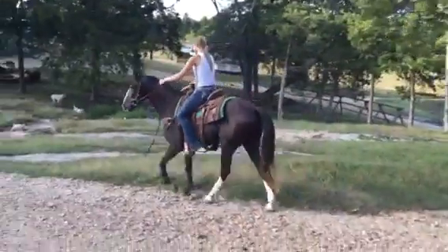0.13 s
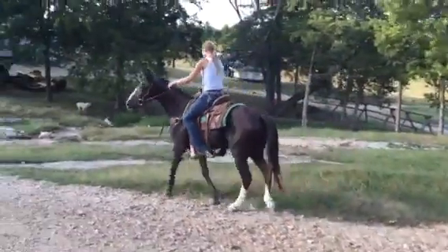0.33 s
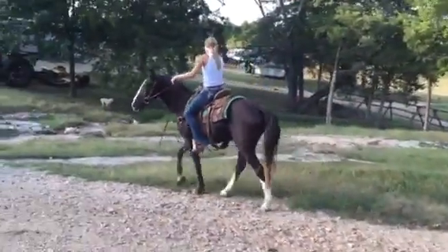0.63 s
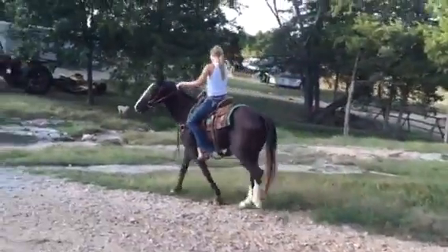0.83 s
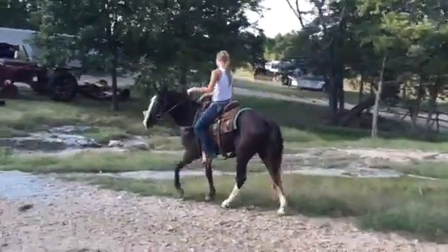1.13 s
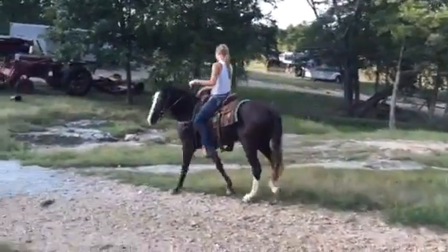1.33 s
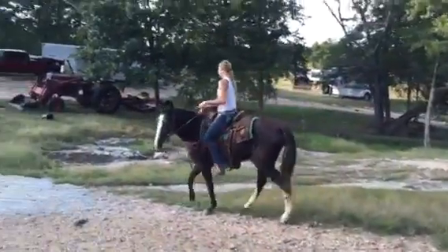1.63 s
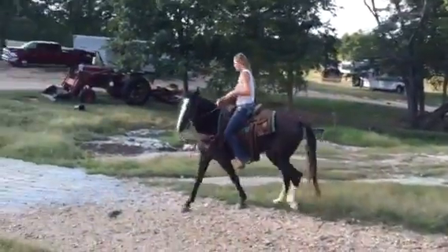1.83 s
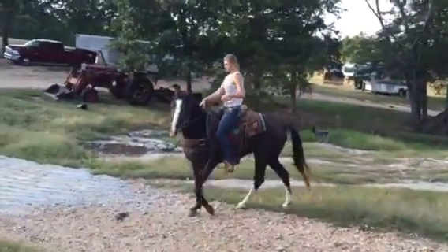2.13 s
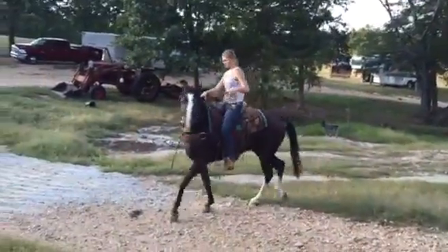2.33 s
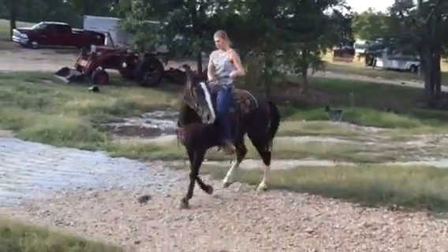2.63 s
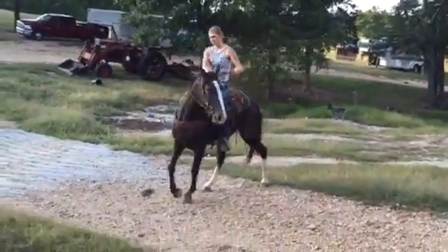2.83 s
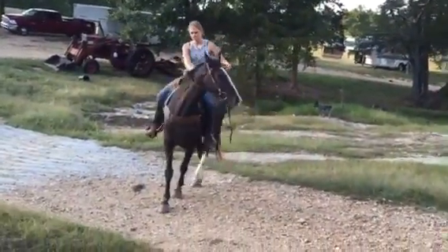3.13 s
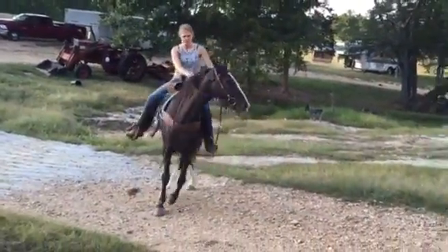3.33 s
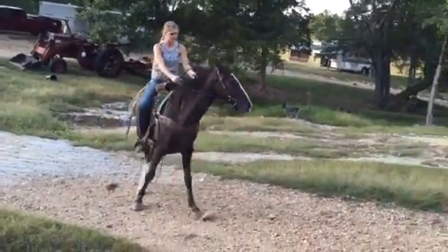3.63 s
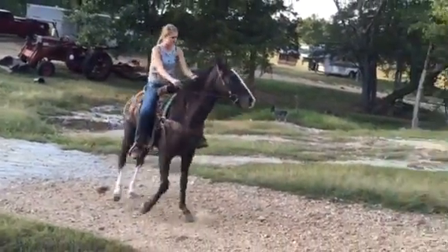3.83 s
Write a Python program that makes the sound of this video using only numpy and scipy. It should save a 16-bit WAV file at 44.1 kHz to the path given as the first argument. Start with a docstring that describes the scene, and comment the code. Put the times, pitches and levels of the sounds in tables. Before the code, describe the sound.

A horse walks over gravel outdoors, gritty crunches and clicking stones over a faint breeze.

```python
"""Gravel crunches under a horse's hooves from the first instant, with stones knocking hollowly.
Each crunch layers dense random contacts of fine grit and coarser stones over low noise from the soil.
A faint breeze of coloured noise hisses throughout; knocks and pebble clicks are resonant noise bursts.
Later, firm steps thud as dying low tones of steady pitch with a slap; the yard adds weak, dull scatter."""
import sys
import numpy as np
from scipy import signal
from scipy.fft import rfft, irfft
from scipy.io import wavfile
from scipy.ndimage import uniform_filter1d

SR = 44100
rng = np.random.default_rng(int(sys.argv[2]) if len(sys.argv) > 2 else 0)


def wav_out(sig):
    """Save sig, one row per channel (or a flat mono array), as 16-bit PCM at SR to the path in sys.argv[1]."""
    wavfile.write(sys.argv[1], SR, np.round(np.clip(np.atleast_2d(sig).T, -1, 1) * 32767).astype(np.int16))


N = 176400
T = np.arange(N) / SR  # s
BRIEF = T[:12000]  # time axis of one short sound, s


def amp(db):
    """Decibels to gain."""
    return 10 ** (np.asarray(db) / 20)


def unit(x):
    """Scales to rms 1."""
    return x / np.sqrt(np.mean(x ** 2) + 1e-20)


def add(mix, start_s, sound):
    """Mixes a sound in at its start time, cutting it at the end of the mix."""
    part = mix[max(round(start_s * SR), 0):][:len(sound)]
    part += sound[:len(part)]


def colour(x, points):
    """Shapes the spectrum by (Hz, dB) points joined along log frequency; rms 1."""
    point_hz, point_db = np.transpose(points)
    hz = np.fft.rfftfreq(len(x), 1 / SR)
    gain_db = np.interp(np.log(hz + 1), np.log(point_hz), point_db)
    return unit(irfft(rfft(x) * amp(gain_db), len(x)))


def fade(t60_s):
    """A short envelope that falls 60 dB in t60_s seconds."""
    return amp(-60 * BRIEF / t60_s)


def burst(hz, q, t60_s, rise_s=1 / SR):
    """A rough, dying contact: fading noise through one resonance, applied twice; peak 1."""
    resonance = signal.iirpeak(hz, q, fs=SR)
    contact = rng.standard_normal(len(BRIEF)) * np.minimum(BRIEF / rise_s, 1) * fade(t60_s)
    ringing = signal.lfilter(*resonance, signal.lfilter(*resonance, contact))
    return ringing / abs(ringing).max()


def grains(level, per_s, spread_db, cycles, lo_hz, hi_hz, count=28):
    """Random contacts between stones of many sizes: dense under the hoof, single ticks as they settle."""
    thinning = 0.38  # contacts a second follow this power of the level
    busy = (level / level.max()) ** thinning
    out = np.zeros(N)
    for hz in np.geomspace(lo_hz, hi_hz, count):
        strength_db = spread_db * np.minimum(rng.exponential(size=N), 3.5)
        strength = amp(strength_db) * np.sign(rng.standard_normal(N))
        hits = strength * (rng.random(N) < busy * per_s / count / SR)
        ring = np.exp(-BRIEF * hz / cycles) * np.sin(2 * np.pi * hz * BRIEF)
        out += np.sqrt(hz) * signal.oaconvolve(hits, unit(ring))[:N]
    return out / np.sqrt(busy)  # evens out the power; the layer's level is applied later


def patchy(x, depth_db=3):
    """The colour drifts as the hoof meets different stones: smoothed random gain over time and pitch."""
    spectrum = signal.stft(x, nperseg=512, noverlap=384)[2]
    across_pitch = uniform_filter1d(rng.standard_normal(spectrum.shape), 5, 0)
    drift = unit(uniform_filter1d(across_pitch, 12, 1))
    return unit(signal.istft(spectrum * amp(depth_db * drift), nperseg=512, noverlap=384)[1][:N])


# Hooves landing, rolling or dragging:
# (start_s, rise_s, fall_20db_s [time to fall 20 dB], grit_db, stones_db, soil_db)
HOOF_CRUNCHES = [ (-0.015, 0.045, 0.127, -37.5, -36, -41), (0.284, 0.0073, 0.1492, -32, -38.5, -51.5),
                 (0.33, 0.09, 0.1457, -36.5, -38, -44), (0.455, 0.0366, 0.09, -40, -39, -42.5),
                 (0.786, 0.007, 0.042, -36, -34.5, -48), (0.848, 0.0304, 0.0629, -42, -44.5, -54.5),
                 (0.951, 0.055, 0.1071, -46, -40, -48), (1.243, 0.0209, .06, -37, -38, -50),
                 (1.29, .055, .04, -52, -43, -55), (1.426, 0.01855, 0.1127, -41, -37, -46.5),
                 (1.803, 0.0183, 0.11, -44, -38, -45.5), (1.913, 0.0306, 0.0871, -38.5, -52, -73),
                 (1.995, 0.00276, 0.1258, -42, -35.5, -50.5), (2.240, 0.0074, 0.1034, -32.5, -39, -45),
                 (2.29, 0.0489, 0.04, -45.5, -39.5, -48), (2.432, 0.007, 0.05, -49, -45.5, -47.5),
                 (2.721, 0.019, .03, -52, -49, -47), (2.502, .006, 0.08, -47, -43, -51),
                 (2.624, 0.0197, 0.0713, -46, -44, -54.5), (2.916, 0.0229, 0.1408, -42.5, -38, -46.5),
                 (3.057, 0.0177, 0.0143, -37, -49, -81), (3.142, 0.0035, 0.08, -47, -39, -41),
                 (3.172, 0.00306, 0.0306, -38, -35, -35), (3.258, 0.0218, 0.088, -48, -41.5, -50),
                 (3.393, 0.0204, 0.04, -36.5, -43, -50), (3.442, 0.0029, 0.065, -40, -43, -52),
                 (3.574, 0.003, 0.06, -47, -42.5, -57), (3.59, 0.08, 0.16, -47, -43.5, -52),
                 (3.717, 0.008, 0.023, -27.5, -28, -41.5), (3.735, 0.00676, 0.0116, -37.5, -27, -38),
                 (3.772, 0.0097, 0.0018, -44, -31.5, -41)]
# Loose gravel trickling: (time_s, grit_level_db)
LOOSE_TRICKLE = [(0, -54.5), (.66, -53.5), (.76, -70.5), (.9, -56.5), (1.75, -58), (2.12, -53), (2.2, -60),
                 (4, -56)]


def gravel_levels(trickle_stones_db=-3):
    """Each hoof presses and releases grit, stones and soil; powers add over a trickle of loose gravel."""
    loose = amp(np.interp(T, *np.transpose(LOOSE_TRICKLE)))
    power = np.square([loose, amp(trickle_stones_db) * loose, np.zeros(N)])
    for start_s, rise_s, fall_s, *layers_db in HOOF_CRUNCHES:
        t = np.maximum(T - start_s, 0)
        press = np.sqrt(np.minimum(t / rise_s, 1)) * amp(-20 * np.maximum(t - rise_s, 0) / fall_s)
        power += np.square(amp(layers_db)[:, None] * press)
    return np.sqrt(power)


# Tone of the fine grit: (freq_hz, gain_db)
GRIT_COLOUR = [(700, -10.5), (1600, -4), (3500, 1), (4800, -5.5), (6000, 0), (7800, -3), (15500, -2)]


def grit(level):
    """Fine grit scuffs: thousands of tiny, bright contacts a second."""
    contacts = grains(level, per_s=26000, spread_db=4.3, cycles=2, lo_hz=1481, hi_hz=14360)
    return level * patchy(colour(contacts, GRIT_COLOUR))


# Tone of the coarser stones: (freq_hz, gain_db)
STONES_COLOUR = [(200, -19), (550, -4), (950, 0), (1400, -4.5), (2000, -6), (2600, -17), (3800, -11),
                 (5000, -17.5), (12000, -45)]


def stones(level):
    """Coarser stones grind: fewer contacts that ring lower and slightly longer in cycles."""
    contacts = grains(level, per_s=4500, spread_db=3.5, cycles=2.4, lo_hz=347.3, hi_hz=4470)
    return level * patchy(colour(contacts, STONES_COLOUR))


# Tone of the shaken soil: (freq_hz, gain_db)
SOIL_COLOUR = [(30, -48), (70, -2.5), (110, 0.5), (240, -2), (3000, -52.5)]


def soil(level):
    """The soil below shakes as low noise that follows the hoof's pressure."""
    return level * colour(rng.standard_normal(N), SOIL_COLOUR)


def gravel():
    """Grit, stones and soil sound together, each riding its own pressure curve."""
    on_grit, on_stones, on_soil = gravel_levels()
    return grit(on_grit) + stones(on_stones) + soil(on_soil)


# Tone of the breeze: (freq_hz, gain_db)
BREEZE_COLOUR = [(22, -38), (55, 6), (400, -7.5), (1600, -7.5), (15000, -12)]


def breeze(level_db=-62):
    """A faint breeze: steady coloured noise."""
    return amp(level_db) * colour(rng.standard_normal(N), BREEZE_COLOUR)


# Stones knocked together under a hoof: (start_s, level_db, pitch_hz)
STONE_KNOCKS = [(0.035, -21.5, 1135), (0.051, -21, 900), (0.121, -30.5, 932), (0.141, -30, 700),
                (0.411, -28, 1001), (1.612, -36, 1232), (2.806, -40, 1000), (2.354, -30, 893),
                (2.462, -35, 898), (2.608, -24, 971.5), (2.639, -29.5, 1031), (2.657, -29.5, 1100),
                (2.832, -32.5, 1125), (2.866, -30.5, 1020), (2.906, -31, 960), (2.997, -30.5, 1145),
                (3.265, -31, 772), (3.449, -30.5, 878), (3.575, -31, 1000), (3.657, -30, 897),
                (3.782, -26, 785)]


def knocks(ring_q=1.7, rise_s=.003, t60_s=0.0257, crack_db=-9, crack_hz=3000, crack_q=.45):
    """A brief, rough contact on a larger stone rings one hollow resonance, with a light crack on top."""
    out = np.zeros(N)
    for start_s, level_db, pitch_hz in STONE_KNOCKS:
        crack = amp(crack_db) * burst(crack_hz, crack_q, t60_s, rise_s)
        ring = burst(pitch_hz, ring_q, t60_s, rise_s)
        add(out, start_s, amp(level_db) * (ring + crack))
    return out


def yard(x, level_db=-20.5, t60_s=0.27):
    """Weak, dull scatter from the ground and the trees: a fading noise tail smears the sound."""
    tail = colour(rng.standard_normal(len(BRIEF)), [(1000, 0), (15000, -5.5)]) * fade(t60_s)
    return amp(level_db) * signal.fftconvolve(x, tail / np.linalg.norm(tail))[:N]


# Kicked pebbles striking the gravel: (start_s, level_db, brightest_hz, t60_s)
PEBBLE_CLICKS = [(0.161, -18, 10880, 0.0144), (0.402, -13, 5210, 0.0146), (0.423, -15, 10500, 0.0256),
                 (0.582, -25, 4820, .012), (0.607, -26, 6561, .05), (0.902, -22, 8700, 0.015),
                 (1.0815, -19, 7530, 0.00315), (1.1095, -21, 3620, 0.0123), (1.1142, -13, 10820, 0.0111),
                 (1.1298, -12.5, 8880, 0.00294), (1.165, -23, 10000, 0.0045), (1.1808, -25.5, 9500, 0.0048),
                 (1.2414, -25.5, 6900, 0.0118), (1.427, -23, 5800, 0.0138), (1.998, -17, 7700, 0.0257),
                 (2.5061, -20.5, 2670, .018), (2.519, -24, 6700, 0.0188), (3.1277, -21.5, 8100, .004),
                 (3.145, -15.5, 6030, 0.0129), (3.280, -17, 6450, 0.0128), (3.697, -24.5, 2960, .02),
                 (3.948, -29, 9700, 0.0142)]


def clicks(snap_q=0.724, rattle_db=-21.5, rattle_t60_s=0.069):
    """A pebble snaps against another and rattles the grit around it at the same resonance."""
    out = np.zeros(N)
    for start_s, level_db, brightest_hz, t60_s in PEBBLE_CLICKS:
        snap = burst(brightest_hz, snap_q, t60_s)
        rattle = amp(rattle_db) * burst(brightest_hz, snap_q, rattle_t60_s)
        add(out, start_s, amp(level_db) * (snap + rattle))
    return out


# Weight coming down on the ground: (start_s, level_db, pitch_hz, t60_s)
WEIGHT_THUDS = [(2.010, -35, 158.5, 0.075), (2.360, -39.5, 170.5, 0.0586), (2.507, -24, 113.5, 0.0837),
                (3.177, -25.5, 174, .055), (3.207, -34.5, 176, 0.039), (3.417, -22, 199.8, 0.0211),
                (3.737, -36, 111, 0.066)]


def thuds(rise_s=0.00686, slap_db=-8, slap_hz=430, slap_q=0.72):
    """The hoof slaps down and the ground bounces under the weight as a dying low sine of steady pitch."""
    out = np.zeros(N)
    for start_s, level_db, pitch_hz, t60_s in WEIGHT_THUDS:
        swell = np.minimum(BRIEF / rise_s, 1)
        decay = amp(-60 * (BRIEF / t60_s) ** 1.402)  # slow at first, then steeper
        bounce = swell * decay * np.sin(2 * np.pi * pitch_hz * BRIEF)
        slap = amp(slap_db) * burst(slap_hz, slap_q, t60_s)
        add(out, start_s, amp(level_db) * (bounce + slap))
    return out


def scene():
    """The horse on the gravel, the yard's reply and the breeze, as one channel."""
    horse = gravel() + knocks() + clicks() + thuds()
    return (horse + yard(horse) + breeze())[None]


def record(dry, edge_hz=15700):
    """Band limit: a steep low-pass removes the top of the treble."""
    low_pass = signal.firwin(301, edge_hz, window=("kaiser", 8), fs=SR)
    return signal.oaconvolve(dry, low_pass[None], "same")


dry = scene()
out = record(dry)
wav_out(out)
```